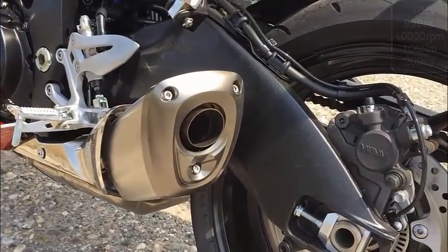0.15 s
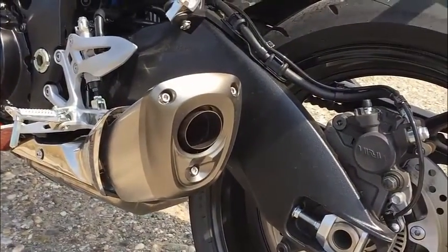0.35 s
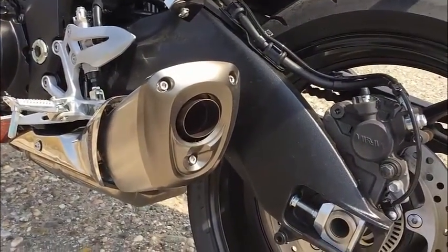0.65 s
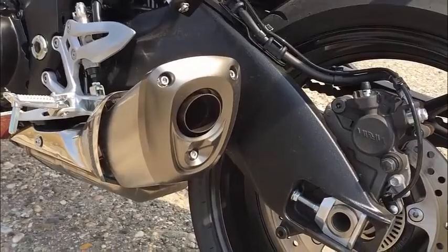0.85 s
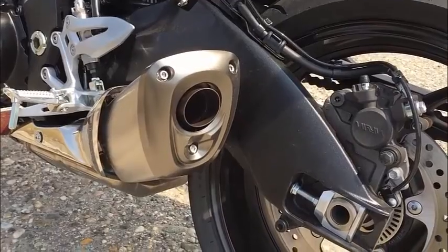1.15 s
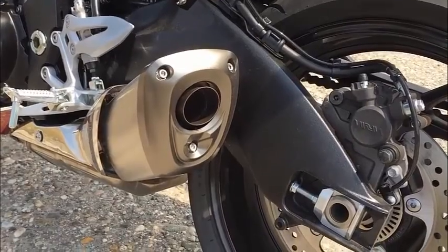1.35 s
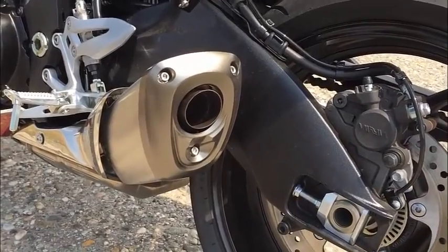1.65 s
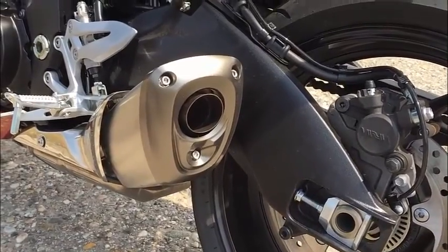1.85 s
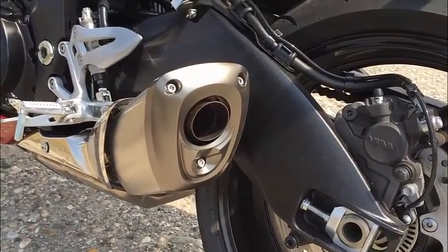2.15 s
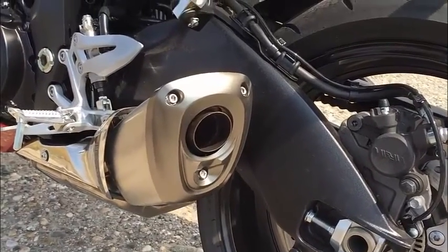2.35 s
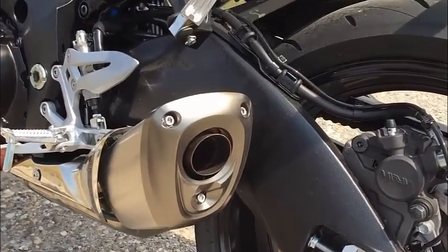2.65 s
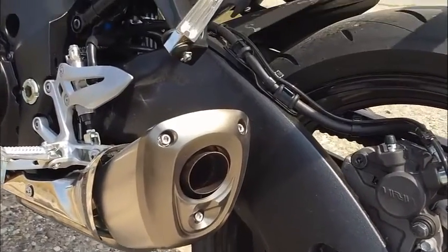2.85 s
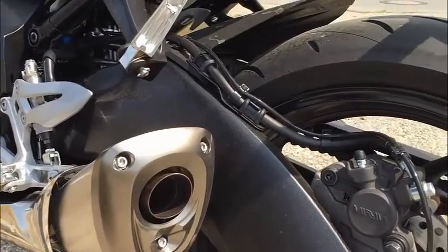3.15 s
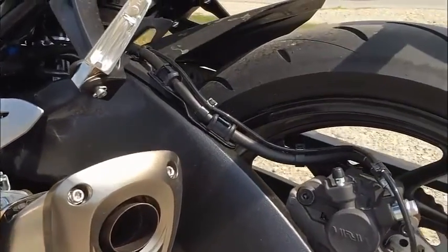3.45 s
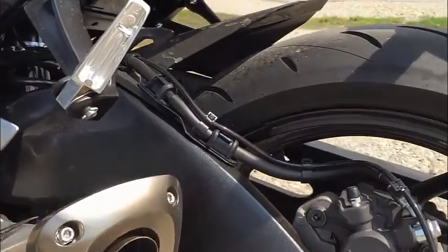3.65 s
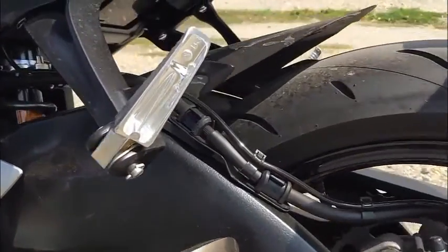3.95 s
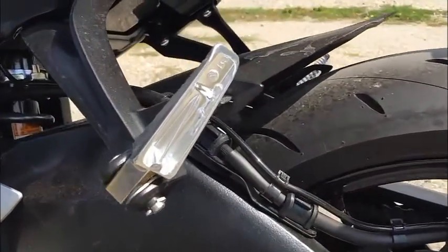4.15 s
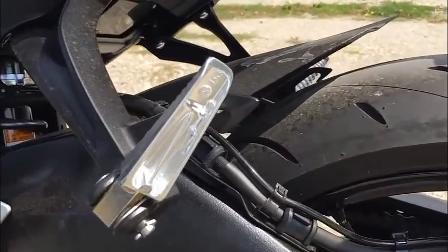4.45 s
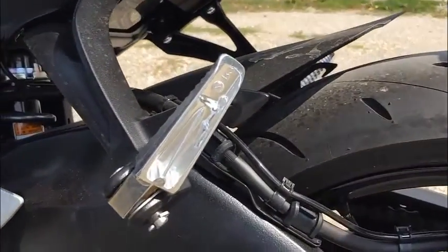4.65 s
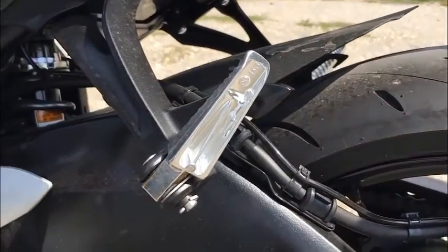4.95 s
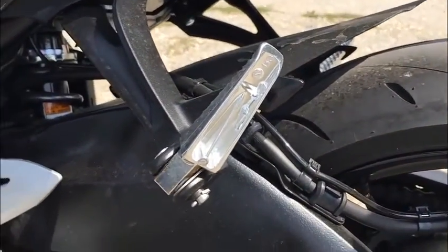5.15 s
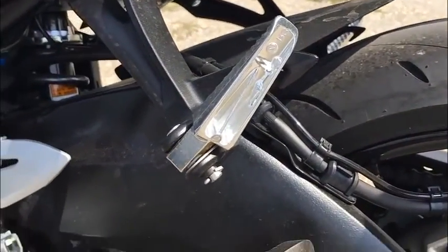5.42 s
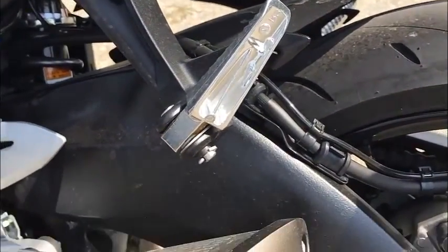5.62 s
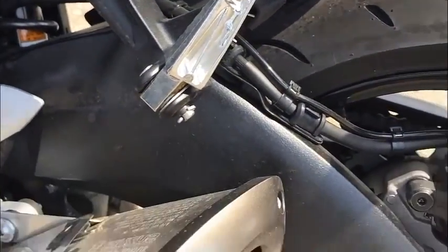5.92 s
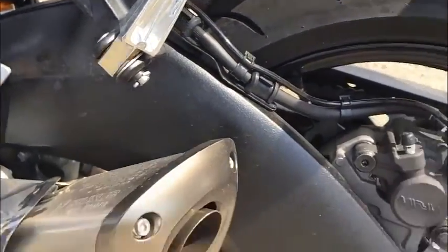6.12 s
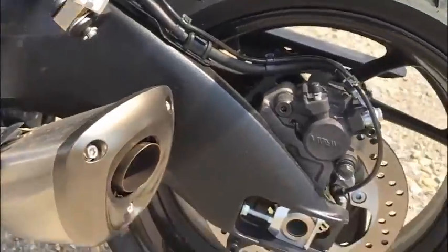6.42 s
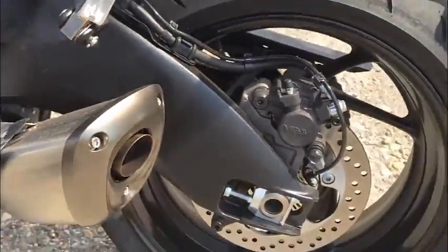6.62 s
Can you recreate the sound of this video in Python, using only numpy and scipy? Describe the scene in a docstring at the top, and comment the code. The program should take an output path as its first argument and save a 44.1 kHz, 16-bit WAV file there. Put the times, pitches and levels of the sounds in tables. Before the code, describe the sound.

A motorcycle engine throbs at idle, bassy and muffled, with quiet valve clatter and exhaust hiss. A sharp rev leaps up and hums down; later two more come in quick succession, the last one highest, with low pops as the throttle shuts. After a long descent the idle stumbles a little, then ignition is cut. Gears knock, loose metal rings briefly, and a tiny motor whirrs among cooling ticks. Close, dry outdoor microphone.

```python
"""A four-cylinder motorcycle idles on gravel, with the microphone close to its short silencer.
Pulses at the firing rate drive resonances for the boom and the pipe rasp; gated noise gives clatter and hiss.
Three throttle blips raise the speed; the engine then hums down on the overrun, with soft pops in the silencer.
Switched off, it stumbles to rest with a metallic clack of knocks and rings.
Then a small servo whirrs, as resonant noise, and short noise bursts tick from the hot metal in the open air."""
import sys
import numpy as np
from scipy import signal
from scipy.fft import rfft, irfft, next_fast_len
from scipy.io import wavfile
from scipy.ndimage import uniform_filter1d

SR = 44100
rng = np.random.default_rng(int(sys.argv[2]) if len(sys.argv) > 2 else 0)


def materialize(psi):
    """Save the field psi as 16-bit PCM at rate SR to the path in sys.argv[1].

    A 1-D psi becomes a single channel; in a 2-D psi each row is a channel.
    """
    bounded = np.clip(np.atleast_2d(psi).T, -1, 1)
    quanta = np.round(bounded * 32767).astype(np.int16)
    wavfile.write(sys.argv[1], SR, quanta)


N = 298976
TIME = np.arange(N) / SR   # s
SILENCER_CUT_HZ = 349   # the silencer passes little above this

# tail pipe resonances: frequency_hz, width_hz, level_db
PIPE_MODES = [(455.5, 30, -2), (661, 39.5, 6), (1024, 120, -2.5), (1108, 72, -0.5), (1268, 74, -3),
              (2300, 92, -5.5)]
# colour of turbulent gas in the pipe, relative: frequency_hz, density_db (per Hz)
RASP_COLOUR = [(200, -16.5), (300, 11), (420, -2.5), (560, 0), (900, 0.5), (1300, -5), (1700, -10.5),
               (2600, -8), (5000, -26)]
# throttle blips, speeds before the idle is blended in: opens_s, top_s, top_hz (firings per s),
# climb_hz_per_s, coast_s (time constant), strength_db
THROTTLE_BLIPS = [(1.275, 1.4413, 193.06, 1045, .635, 0), (2.775, 2.9507, 180.38, 942, .5807, .3),
                  (3.245, 3.3923, 230.13, 866.2, .6341, -3.3)]


def from_db(db):
    """Decibels to gain."""
    return 10 ** (np.asarray(db) / 20)


def rms_one(x):
    """Scale to unit power."""
    return x / np.sqrt(np.mean(x ** 2) + 1e-20)


def in_time(rows):
    """Each column of a curve over time, at every sample."""
    s, *columns = np.transpose(rows)
    return [np.interp(TIME, s, column) for column in columns]


def at_speed(rows, firing_hz):
    """Each column of a table by engine speed, at every sample."""
    hz, *columns = np.transpose(rows)
    return [np.interp(firing_hz, hz, column) for column in columns]


def cut(x, hz, kind, order=2):
    """Butterworth filter."""
    return signal.sosfilt(signal.butter(order, hz, kind, fs=SR, output="sos"), x)


def slow_noise(limit_hz):
    """Random wavering below a frequency limit, rms 1."""
    return rms_one(cut(rng.standard_normal(N), limit_hz, "low"))


def coloured(points):
    """Noise with the given spectrum, rms 1."""
    hz, db = np.transpose(points)
    size = next_fast_len(N)
    f = np.maximum(np.fft.rfftfreq(size, 1 / SR), 1)
    gain = from_db(np.interp(np.log(f), np.log(hz), db))
    skirts = np.minimum(f / hz[0], 1) ** 2 * np.minimum(hz[-1] / f, 1) ** 2
    spectrum = rfft(rng.standard_normal(size)) * gain * skirts
    return rms_one(irfft(spectrum, size)[:N])


def resonate(x, modes):
    """Parallel resonances, neighbours in opposite phase."""
    out = 0
    for k, (hz, width, db) in enumerate(modes):
        r = np.exp(-np.pi * width / SR)
        zeros = [(1 - r * r) / 2, 0, (r * r - 1) / 2]   # unit gain at the peak
        poles = [1, -2 * r * np.cos(2 * np.pi * hz / SR), r * r]
        # the tiny offset keeps the filter state from fading into denormal numbers
        out = out + (-1) ** k * from_db(db) * signal.lfilter(zeros, poles, x + 1e-18)
    return out


def burst(start, decay):
    """A sudden start and an exponential fall with the given time constant."""
    out, first = np.zeros(N), int(start * SR)
    age = TIME[:min(N - first, int(20 * decay * SR))]
    out[first:first + len(age)] = np.exp(-age / decay)
    return out


def steady(x, window):
    """Divide out the slow level, so that loudness can be set by a curve."""
    size = int(window * SR)
    power = uniform_filter1d(uniform_filter1d(x * x, size), size)
    return x / np.sqrt(np.abs(power) + 1e-12)


def per_firing(cycle, count=1024):
    """A random value for each firing, from a cycle of count values."""
    return rng.standard_normal(count)[cycle.astype(int) % count]


def puffs(cycle, start, fall, base, spread_db=0.0):
    """Once a firing a gate snaps open and decays; spread_db varies how far it opens."""
    since = cycle - start + 1
    return base + from_db(spread_db * per_firing(since)) * np.exp(-(since % 1) / fall)


def outdoors(air_db=-68):
    """Low rumble and thin hiss of the open air, each as coloured noise."""
    # rumble level: time_s, level_db
    rumble_level = [(6.2, -49), (6.35, -48.5), (6.5, -59.5), (6.69, -60), (6.71, -49), (6.78, -54)]
    # rumble spectrum, relative: frequency_hz, density_db (per Hz)
    rumble_colour = [(15, -46), (25, -19), (48, 0), (65, 6.5), (91, -10.5), (123, 1.5), (267, -16),
                     (349, -10), (467, -30.5), (700, -24), (910, -55), (1540, -120)]
    # air hiss spectrum, relative: frequency_hz, density_db (per Hz)
    air_colour = [(290, -34.5), (500, -1.5), (1430, 0), (1750, -5.5), (2230, -2.5), (2960, -6),
                  (15000, -19.5)]
    rumble = from_db(in_time(rumble_level)[0]) * coloured(rumble_colour)
    return rumble + from_db(air_db) * coloured(air_colour)


def servo():
    """A small geared motor parks the exhaust valve: noise rings in the bands of its whine."""
    # run of the motor: time_s, level_db
    servo_level = [(6.1, -90), (6.2, -71), (6.3, -72), (6.35, -56.5), (6.385, -68), (6.42, -91)]
    # whine bands, relative: frequency_hz, width_hz, level_db
    whine_bands = [(2347, 150, 2), (5100, 300, -11), (5852, 200, -2.5), (6761, 300, -10.5),
                   (8791, 150, -1.5)]
    return from_db(in_time(servo_level)[0]) * rms_one(resonate(rng.standard_normal(N), whine_bands))


def cooling_ticks(decay_s=0.0064):
    """Small dry ticks from the hot pipes: narrow noise that dies away at once."""
    # ticks of hot metal: time_s, level_db (nominal peak), pitch_hz
    hot_ticks = [(6.056, -55, 6000), (6.096, -49.5, 3020), (6.328, -54, 5460), (6.444, -41, 1110),
                 (6.471, -55, 7000), (6.583, -53, 6900), (6.62, -53, 2240), (6.733, -57, 5070)]
    out = 0
    for s, db, hz in hot_ticks:
        tone = rms_one(resonate(rng.standard_normal(N), [(hz, hz * 0.37, 0)])) / 2   # room for noise peaks
        out = out + from_db(db) * burst(s, decay_s) * tone
    return out


def stop_clack(chatter_depth=0.63, chatter_hz=70):
    """Gears knock as the crank comes to rest and rocks back; loose metal parts ring on, chattering."""
    # gear knocks: time_s, level_db, decay_s (time constant)
    gear_knocks = [(5.83, -27.5, 0.0086), (5.836, -32.5, 0.0086), (5.847, -29, 0.0081),
                   (5.865, -41.5, 0.023), (5.88, -39, 0.016)]
    # knock spectrum, relative: frequency_hz, density_db (per Hz)
    knock_colour = [(150, -40.5), (250, -10), (579, -1), (664, 6), (815, -7.5), (1020, -4), (1270, -7),
                    (1390, -3), (2900, -5), (5650, -18.5), (15000, -40)]
    # loose parts left ringing: frequency_hz, t60_s, level_db
    loose_parts = [(340, 0.93, -49), (641, 0.64, -51), (934, 0.8, -55), (3020, 0.26, -45),
                   (3731, 0.23, -42), (4700, .26, -48)]
    strokes = sum(from_db(db) * burst(s, decay) for s, db, decay in gear_knocks)
    first, rings = gear_knocks[0][0], 0
    for hz, t60, db in loose_parts:
        chatter = 1 + chatter_depth * slow_noise(chatter_hz)
        tone = burst(first, t60 / np.log(1000)) * np.sin(2 * np.pi * hz * (TIME - first))
        rings = rings + from_db(db) * chatter * tone
    return strokes * coloured(knock_colour) + rings


def afterfire(thump_hz=105, thump_fall=1.56):
    """The first rich firings crack, unburnt fuel pops as the throttle shuts; each bang swings the silencer."""
    # bangs in the silencer: time_s, thump_db, crackle_db, length_s (crackle time constant)
    bangs = [(1.285, -23, -20, 0.01), (1.302, -26, -28, 0.0079), (2.817, -23, -21, 0.0027),
             (1.466, -18, -36, .008), (2.948, -19, -31, 0.015), (3.4, -23, -27.5, 0.011),
             (3.5, -14, -23, 0.019)]
    thump = crackle = 0
    for s, thump_db, crackle_db, length in bangs:
        swing = np.sin(2 * np.pi * thump_hz * (TIME - s))
        thump = thump + from_db(thump_db) * burst(s, thump_fall * length) * swing
        crackle = crackle + from_db(crackle_db) * burst(s, length)
    return thump + crackle * coloured(RASP_COLOUR)


def reflections(x, echo_db=-14.5, count=8):
    """Ground, wheel and swingarm return short echoes that give the noise a fixed, fine colour."""
    lags = (rng.uniform(.002, .03, count) * SR).astype(int)
    echoes = sum((-1) ** k * np.pad(x, (lag, 0))[:N] for k, lag in enumerate(lags))
    gain = from_db(echo_db) / 2
    return (x + gain * echoes) / np.sqrt(1 + count * gain ** 2)


def gas_hiss(cycle, hiss_db, jet_db=4.5, spread_db=2.0):
    """The jet at the outlet hisses in time with the firings."""
    # jet spectrum, relative: frequency_hz, density_db (per Hz)
    jet_colour = [(2500, -28.5), (4000, 5.5), (5000, 6), (6500, 5), (8000, 0.5), (9500, 1), (10500, -3.5),
                  (12500, -1.5), (15500, -9)]
    gate = rms_one(puffs(cycle, start=0.34, fall=0.67, base=1.0, spread_db=spread_db))
    return from_db(hiss_db + jet_db) * gate * coloured(jet_colour)


def casing(x):
    """The engine's metal rings in its modes."""
    # engine casing modes, relative: frequency_hz, t60_s, level_db
    casing_modes = [(1283, 0.031, 5.5), (1940, .1, -10), (2110, 0.1, -10), (2438, 0.023, 1),
                    (2900, 0.035, 1), (3050, 0.046, -3), (3386, .08, -2.5), (3810, .08, -8),
                    (4130, 0.09, -19.5), (4535, 0.054, -12), (5283, 0.047, -6), (5630, 0.044, -8),
                    (6820, .04, -15.5)]
    # ring time becomes bandwidth, and longer rings get more level
    modes = [(hz, np.log(1000) / np.pi / t60, db + 10 * np.log10(t60)) for hz, t60, db in casing_modes]
    return resonate(x, modes)


def valve_train(cycle, clatter_db, taps_per_s=450, tap_db=-3.5):
    """Valves and chain patter on the casing, strongest around each firing."""
    # chain noise spectrum, relative: frequency_hz, density_db (per Hz)
    chain_colour = [(820, -35), (1400, -1), (1690, -2.5), (2410, -1), (3270, -7), (3520, -3.5), (3760, -4),
                    (4220, -9.5), (4610, -10.5), (5010, -16.5), (5490, -17.5), (6000, -15), (7020, -19.5),
                    (7620, -24), (10000, -29), (13000, -62.5), (22000, -120)]
    gate = puffs(cycle, start=.45, fall=0.35, base=0.48)
    taps = (rng.random(N) < taps_per_s / SR) * rng.standard_normal(N) * gate
    ringing = steady(casing(taps), window=0.1)
    chain = rms_one(gate) * coloured(chain_colour)
    return from_db(clatter_db) * (from_db(tap_db) * ringing + chain)


def pipe_rasp(cycle, load, rasp_db, edge_db=-11.5, ring_db=-6.0, rush_db=-2.0, bark_db=-3.5,
              loaded_rush_db=-3.0, front_spread_db=1.5):
    """Each pulse front rings the tail pipe and drags turbulence after it; under load the fronts bark."""
    # bark of the outlet under load, relative: frequency_hz, width_hz, level_db
    bark_modes = [(300, 70, -8.5), (740, 200, -4), (1063, 220, 0.5), (1376, 270, -4), (2300, 600, -6)]
    fronts = np.diff(np.floor(cycle + .45), prepend=0) * from_db(front_spread_db * per_firing(cycle))
    fronts = cut(fronts, 1300, "low", order=1)
    edge = from_db(edge_db) * steady(resonate(fronts, PIPE_MODES), window=.05)
    bark = from_db(bark_db) * load * steady(resonate(fronts, bark_modes), window=.05)
    gate = puffs(cycle, start=.52, fall=.36, base=0.5)
    ring = from_db(ring_db) * steady(resonate(gate * rng.standard_normal(N), PIPE_MODES), window=.05)
    rush = from_db(rush_db + loaded_rush_db * load) * rms_one(gate) * coloured(RASP_COLOUR)
    damping_db = -5 * load   # fast gas flow damps the pipe's resonances
    return from_db(rasp_db) * (from_db(damping_db) * (edge + ring) + bark + rush)


def gas_pulses(cycle, uneven_db, jitter_per_db=-0.01):
    """One narrow pulse per firing; uneven burning varies both its strength and its moment."""
    strength_db = uneven_db * per_firing(cycle)
    opening = .39 + jitter_per_db * uneven_db * per_firing(cycle)   # in cycles
    return np.exp(-((cycle % 1 - opening) / 0.055) ** 2) * from_db(strength_db)


def thuds(cycle, uneven_db, swirl_db=-15.0, throb_db=-14.0):
    """The silencer turns each pulse into a round thud; ragged burning adds swirling gas."""
    # silencer resonances, relative: frequency_hz, width_hz, level_db
    silencer_modes = [(95.4, 40.6, 0.5), (123.4, 72.5, 0.5), (188.6, 87, -6), (310, 80, -19)]
    pulses = rms_one(cut(gas_pulses(cycle, uneven_db), 28, "high"))
    throb = from_db(throb_db) * resonate(pulses, [(48, 30, 0.0056)])   # the outlet also throbs slowly
    tone = throb - resonate(pulses, silencer_modes)
    ragged = uneven_db ** 2 / 2
    swirl_noise = coloured([(55, -7), (120, -1.5), (170, -2.5), (240, -24.5), (400, -24.5)])
    return steady(cut(tone, 420, "low"), window=.07) + swirl_noise * from_db(swirl_db) * ragged


def overrun_hum(cycle, waver_db=2.0, blur_cycles=0.016, blur_hz=45, pipe_db=-0.5, leak_db=-4.5):
    """Unfuelled pistons only pump air: upper lines waver, blur, and swell as they cross the pipe's modes."""
    # hum lines, relative: order (multiple of the firing rate), level_db
    hum_lines = [(.5, -32.5), (1, 2), (1.5, -22), (2, -20), (2.5, -53), (3, -32), (3.5, -54.5), (4, -42),
                 (5, -40.5), (6, -32.5), (7, -38.5), (8, -35), (9, -34.5)]
    out = 0
    for order, db in hum_lines:
        waver = waver_db * (order != 1) * slow_noise(19)
        blur = blur_cycles * max(order - 1, 0) * slow_noise(blur_hz)
        out = out + from_db(db + waver) * np.cos(2 * np.pi * (order * (cycle - .1) + blur))
    lower = cut(out, SILENCER_CUT_HZ, "low", order=10)
    upper = cut(out, 450, "high", order=10)
    return rms_one(lower + from_db(leak_db) * upper + from_db(pipe_db) * resonate(upper, PIPE_MODES))


def exhaust(cycle, burn, load, uneven_db, growl_db=-12.0, third_db=0.5, churn_db=-18.0):
    """Firing thuds give way to the hum when the throttle shuts; under load the wave steepens and growls."""
    burn = np.clip(burn, 0, 1)
    overtones = np.sin(4 * np.pi * cycle) + from_db(third_db) * np.sin(6 * np.pi * cycle)
    churn = from_db(churn_db) * coloured([(170, -9), (240, -3.5), (320, -2), (380, -10.5)])
    # the silencer muffles the overtones as they climb
    loaded = cut(from_db(growl_db) * overtones + churn, SILENCER_CUT_HZ, "low", order=10)
    fired = np.sqrt(burn) * thuds(cycle, uneven_db)
    pumped = np.sqrt(1 - burn) * overrun_hum(cycle)
    return fired + pumped + load * loaded


def engine_speed():
    """Each blip climbs steadily and coasts down exponentially, until the idle catches it; firings per s."""
    # idle, hunting slightly until the ignition is cut: time_s, speed_hz (firings per s)
    idle_speed = [(0, 38.58), (.15, 40.33), (.35, 36.95), (.55, 40.22), (.85, 38.26), (1.1, 41.07),
                  (1.28, 38.45), (2.75, 35.86), (4.8, 33.36), (5.15, 41.2), (5.45, 37.14), (5.6, 39.11),
                  (5.67, 26.91), (5.78, 13.22)]
    runs = []
    for _, top_s, top_hz, climb, coast_s, _ in THROTTLE_BLIPS:
        rise = top_hz + climb * (TIME - top_s)
        fall = top_hz * np.exp((top_s - TIME) / coast_s)
        runs.append(np.minimum(rise, fall))
    free = np.maximum(np.max(runs, axis=0), 0)
    return np.cbrt(free ** 3 + in_time(idle_speed)[0] ** 3)   # smooth handover to the faster one


def throttle(attack_s=0.037, release_s=.035, fuel_cut_s=0.029, slack_s=0.0083):
    """The grip snaps open and shuts just before each top: opening 0-1, fuelling 0-1, strength dB, slack 0-1."""
    opening = fuelled = strength_db = slack = 0
    for opens, top, _, _, _, db in THROTTLE_BLIPS:
        attack = np.clip((TIME - opens) / attack_s, 0, 1)
        grip = attack * np.clip((top - TIME) / release_s, 0, 1)
        opening, strength_db = opening + grip, strength_db + db * grip
        # firing dies away over fuel_cut_s after the top
        fuelled = fuelled + attack * np.clip(1 - (TIME - top) / fuel_cut_s, 0, 1)
        # a moment between pulling and coasting
        slack = slack + np.exp(-((TIME - top - fuel_cut_s / 2) / slack_s) ** 2)
    return opening, fuelled, strength_db, slack


def weak_firings(cycle):
    """Loss in dB as a lean mixture barely catches, held from one firing to the next."""
    # lean firings: time_s, loss_db
    lean_firings = [(.02, -2.5), (.225, -8), (.355, -5), (2.27, -8), (2.63, -6.5), (2.68, -14),
                    (2.755, -16.5), (4.34, -4), (4.36, -4), (4.59, -9.5), (4.71, -9), (4.785, -12.5),
                    (5.0, -12), (5.195, -6)]
    firing = np.floor(cycle - 1 / 3)
    loss_db = sum(db * (firing == firing[int(s * SR)]) for s, db in lean_firings)
    return uniform_filter1d(loss_db, size=200)


def motorcycle(loaded_uneven_db=0.76, slack_db=-11.5, weak_rasp_share=0.28, flutter_db=0.95, flutter_hz=14.2):
    """Speed and throttle set the boom, rasp, clatter and hiss of the engine until the crank stops."""
    # layer settings with the throttle open: boom_db, rasp_db, clatter_db, hiss_db
    open_levels = (-4.5, -20, -28.5, -41.5)
    # layer settings with the throttle shut: firing_hz, boom_db, rasp_db, clatter_db, hiss_db
    shut_levels = [(12.9, -27, -44, -46.5, -80), (27, -19, -38.5, -40, -63.5), (39.7, -13, -37, -39, -59),
                   (47.3, -19.5, -44.5, -44, -64.5), (72, -19.5, -46.5, -46.5, -62.5),
                   (104.3, -12.5, -47.5, -39.5, -56.5), (125, -11, -39, -35.5, -46),
                   (185, -10.5, -29.5, -31, -43), (228, -13, -28.5, -29, -42.5)]
    # as the coasting engine slows, fuel returns and burns raggedly at first:
    # firing_hz, fired_share (of the boom, 0-1), uneven_db (between firings)
    relighting = [(40, 1, 1.5), (48, 1, 3), (62, 0.85, 1.5), (86, 0.09, 4), (112.3, 0, 0.6)]
    # the balance of pipe rasp against clatter and hiss drifts up and down over time:
    # time_s, treble_drift_db (clatter and hiss), rasp_drift_db
    balance_drift = [(0, 0.5, 0.5), (2.3, -.5, -1.5), (3.5, 0, -1), (4.2, 0, 4), (4.7, -4.5, -2),
                     (5.1, -1, -0.5), (5.7, -2, 0)]

    firing_hz = engine_speed()
    cycle = np.cumsum(firing_hz) / SR   # counts firings
    opening, fuelled, strength_db, slack = throttle()
    levels = []
    for shut_db, open_db in zip(at_speed(shut_levels, firing_hz), open_levels):
        levels.append((1 - opening) * shut_db + opening * open_db + strength_db)
    boom_db, rasp_db, clatter_db, hiss_db = levels

    relit, ragged_db = at_speed(relighting, firing_hz)
    burn = np.maximum(relit, fuelled)
    uneven_db = (1 - fuelled) * ragged_db + fuelled * loaded_uneven_db
    load = fuelled * np.interp(firing_hz, [60, 120], [0, 1])   # the pipe is driven hard once the speed is up
    weak_db = weak_firings(cycle)
    pumping = np.interp(TIME, [5.76, 5.79], [1, 0])   # the last strokes move no more gas
    turning = np.interp(TIME, [5.795, 5.825], [1, 0])   # then the crank stops
    treble_drift_db, rasp_drift_db = in_time(balance_drift)
    flutter = from_db(flutter_db * slow_noise(flutter_hz))   # the engine's noises waver in level

    boom_level = from_db(boom_db + weak_db + slack_db * slack)
    boom = pumping * boom_level * exhaust(cycle, burn, load, uneven_db)
    rasp = pipe_rasp(cycle, load, rasp_db + rasp_drift_db + weak_rasp_share * weak_db)
    treble = reflections(valve_train(cycle, clatter_db) + gas_hiss(cycle, hiss_db))
    return boom + turning * flutter * (rasp + from_db(treble_drift_db) * treble)


def scene():
    """The engine with its bangs, the clack as it stops, then servo and ticks, all in the open air."""
    after_stop = stop_clack() + cooling_ticks() + servo()
    return (outdoors() + after_stop + afterfire() + motorcycle())[None]


def record(dry, cutoff_hz=15250):
    """The loudest swings are rounded off, the top is cut."""
    rounded = dry / (1 + dry ** 6) ** (1 / 6)
    return signal.sosfilt(signal.ellip(10, .1, 90, cutoff_hz, fs=SR, output="sos"), rounded)


dry = scene()
out = record(dry)
materialize(out)
```